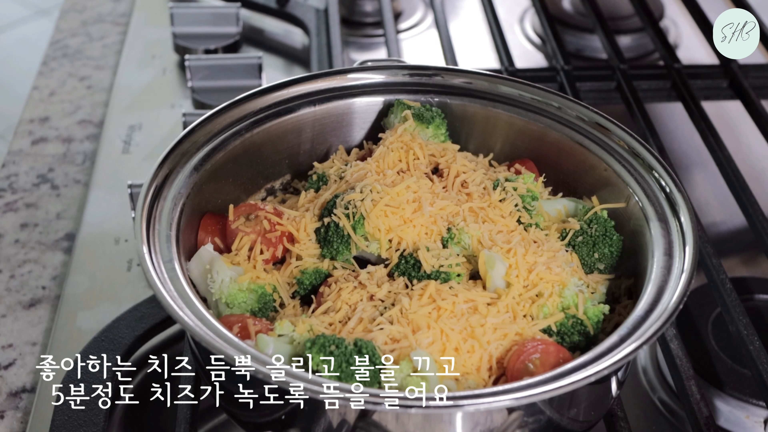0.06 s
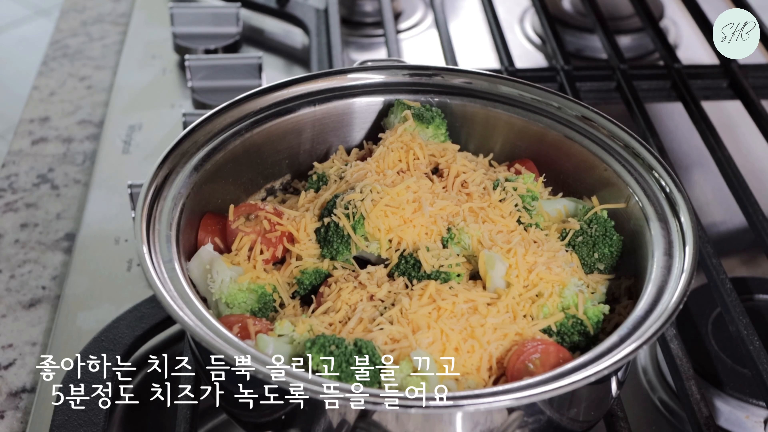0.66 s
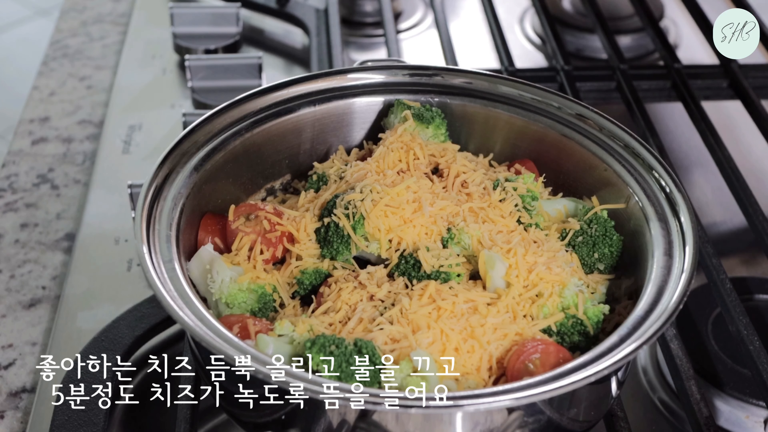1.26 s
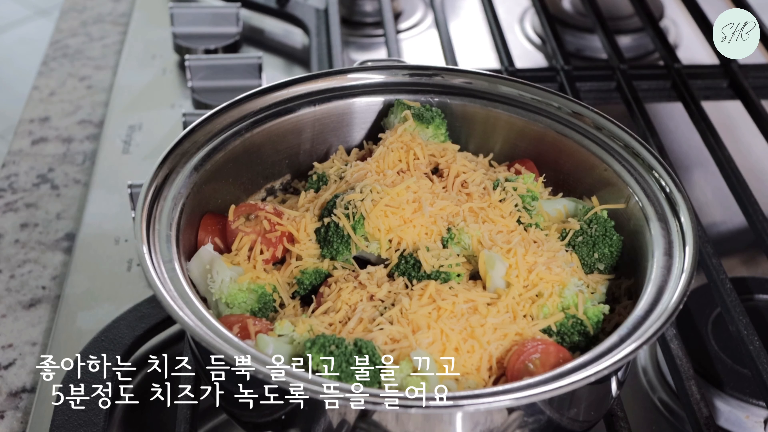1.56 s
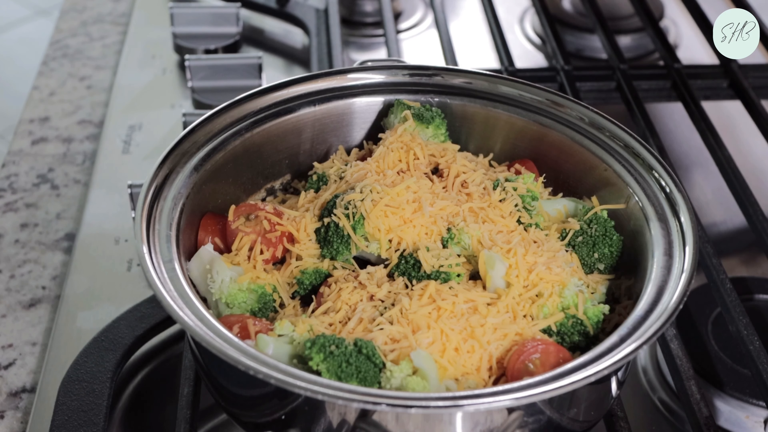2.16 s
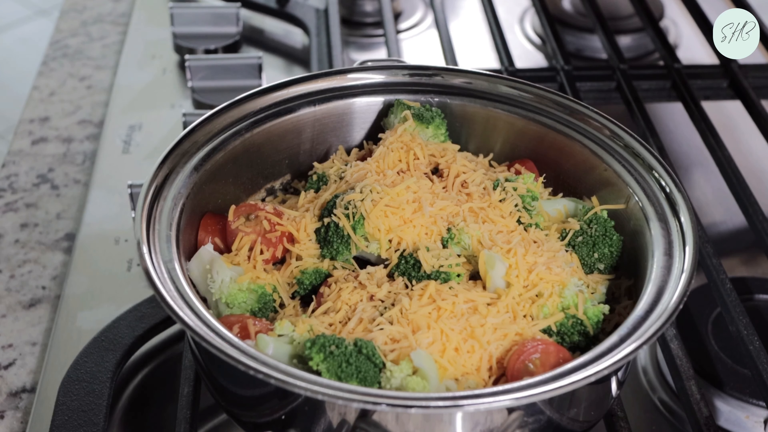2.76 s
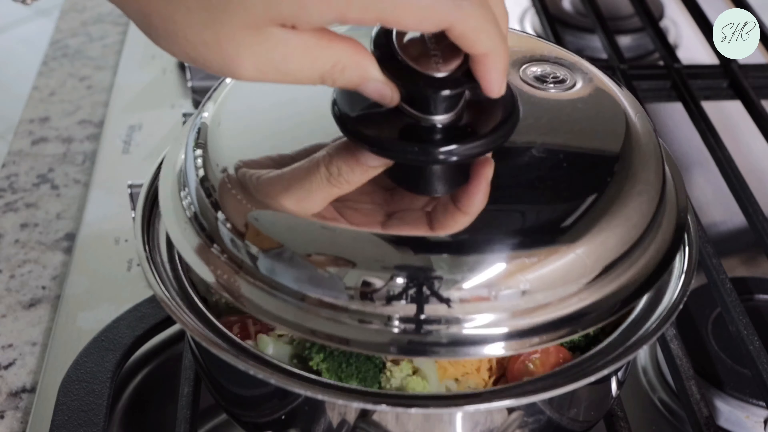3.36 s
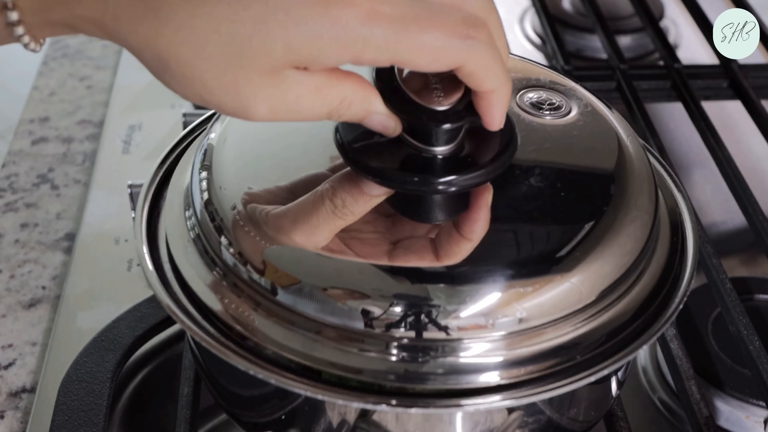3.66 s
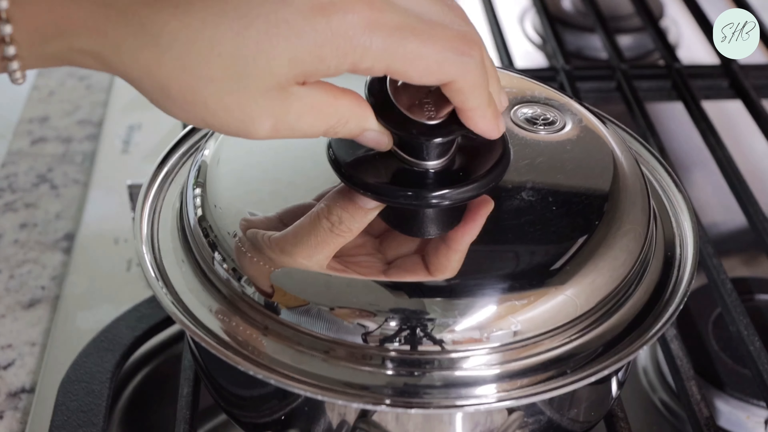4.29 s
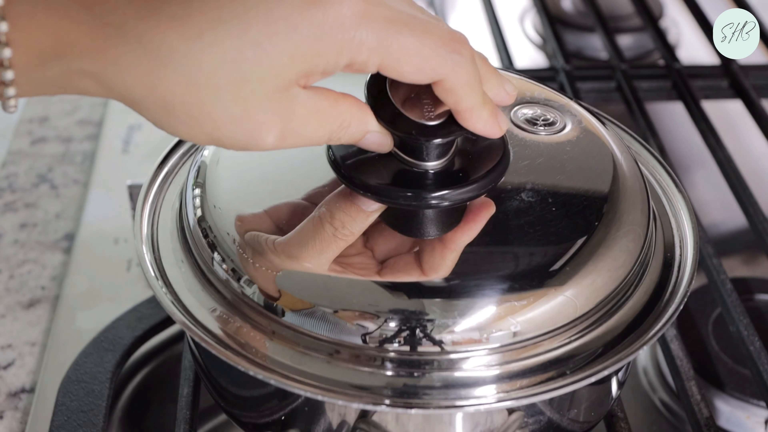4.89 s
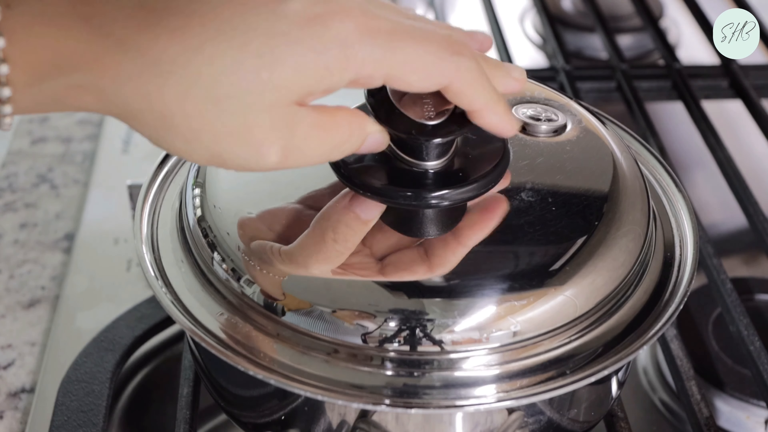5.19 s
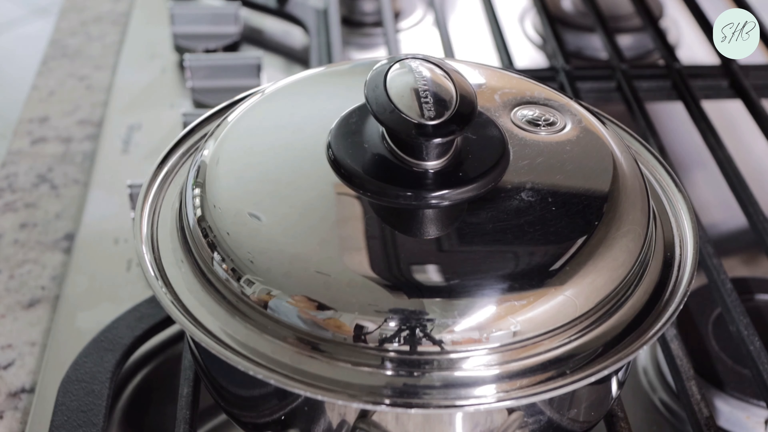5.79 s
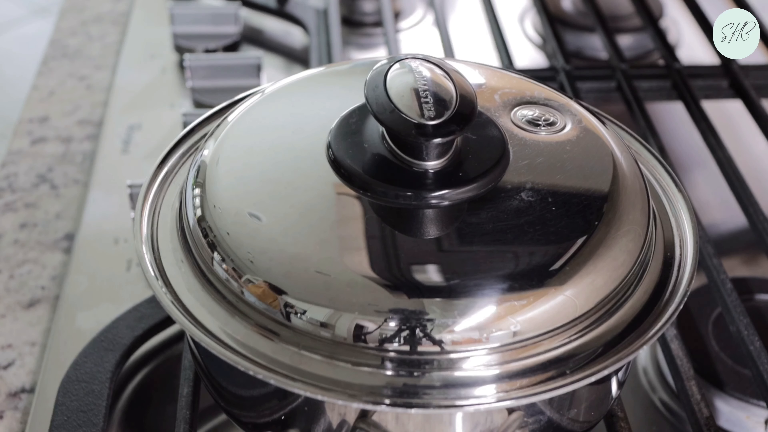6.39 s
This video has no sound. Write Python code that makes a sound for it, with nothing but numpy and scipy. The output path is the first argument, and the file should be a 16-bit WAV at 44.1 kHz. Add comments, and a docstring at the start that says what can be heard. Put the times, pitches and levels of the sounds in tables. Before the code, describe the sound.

A steel lid scrapes, clanks twice onto a pot and rattles brightly before settling, over a low steady kitchen rush.

```python
"""A steel lid clanks twice on a pot, thuds into its seat and rattles brightly as its knob is worked.
Each impact excites the modes of the metal: dense, damped ones clash, and sparse, lasting ones ring.
Earlier come knocks and shoves on the counter, a scrape whose friction sets the lifted lid singing,
and faint squeaks of the grip. A low steady rush and faint hiss fill the small, hard kitchen."""
import sys
import numpy as np
from scipy import signal
from scipy.fft import rfft, irfft, next_fast_len
from scipy.io import wavfile
from scipy.ndimage import map_coordinates

SR = 44100
rng = np.random.default_rng(int(sys.argv[2]) if len(sys.argv) > 2 else 0)


def dump(signal):
    """Clip the signal to [-1, 1] and save it as 16-bit WAV at the path in sys.argv[1]."""
    limited = np.clip(np.atleast_2d(signal).T, -1, 1)
    pcm = np.round(limited * 32767).astype(np.int16)
    wavfile.write(sys.argv[1], SR, pcm)


N = 283991
TIME = np.arange(N) / SR
AGE = np.arange(SR * 3 // 4) / SR  # time since a blow, in s
CONTACT_S = 1 / 5000  # rise time of a steel-on-steel impact
PRESS_LOSS_DB = 4.5  # ring lost at each later contact

# Levels in all tables are relative; a tilt is a spectral slope above about 400 Hz.
# Reverberation time of the kitchen: f/Hz, t60/s
ROOM_DECAY = [(150, 1), (1000, 0.58), (5000, 0.57), (15000, 0.29)]
# Spectral density of the background rush: f/Hz, level/dB
RUSH_SPECTRUM = [(12, -46), (20, -20), (92, -3.5), (171, -7.5), (202, -4.5), (259, 0), (289, -8.5),
                 (362, -2), (478, -11.5), (519, -1.5), (565, -11), (614, -10), (1720, -22), (4190, -27),
                 (15500, -32)]
# Its droning bands: f/Hz, width/Hz, level/dB
DRONE_BANDS = [(105.6, 84, -58.5), (208.1, 11, -59.5), (367, 136, -55.5), (531.4, 7.4, -58.5)]

# Things knocked beside the stove: t/s, level/dB, t60/s, tilt/(dB/octave)
KNOCKS = [(.446, -22.5, .15, 0.8), (.482, -34, 0.43, -.5), (.785, -34, 0.11, 1), (.846, -33, 0.095, -1),
          (1.19, -42, 0.44, 1), (1.333, -37, 0.19, 3), (1.378, -42.5, 0.45, 0.5), (1.905, -51.5, 0.54, 7),
          (2.221, -39.5, 0.029, 3.5)]
# Brushes of hand and sleeve: t/s, level/dB, tilt/(dB/octave)
BRUSHES = [(0.014, -40.5, -4), (.385, -40.5, 1), (2.301, -46.5, 15), (2.80, -51.5, 8), (3.079, -46, 6.5)]
# Something steel shoved along the counter: t/s, counter level/dB, steel level/dB
SHOVES = [(0.616, -35.5, -34.5), (0.948, -34.5, -47.5)]
# Resonances of the counter: f/Hz, width/Hz, level/dB
COUNTER_BANDS = [(300, 149, -6), (610, 540, 1.5), (1040, 307, -6), (1371, 1940, -2), (2760, 1200, -8.5),
                 (4150, 1900, -10), (5353, 2430, -10.5), (6946, 2900, -12.5), (8450, 1900, -15),
                 (10600, 3800, -20.5), (13970, 2954, -32.5)]
# Resonances of chafing steel: f/Hz, width/Hz, level/dB
CHAFE_BANDS = [(3380, 140, 3.5), (3817, 470, .5), (4440, 290, -6), (5420, 370, -7), (8300, 948, -9),
               (12490, 2560, -26)]

# Squeaks of the grip: t/s, duration/s, start f/Hz, end f/Hz, level/dB
SQUEAKS = [(2.24, 0.13, 4762, 4600, -58), (2.72, .061, 4383, 4290, -53.5)]
# Clusters of damped modes excited by the scrape: f/Hz, width/Hz, level/dB
RASP_BANDS = [(600, 340, 0.5), (1490, 510, 2.5), (2240, 377, -5), (2750, 373, -6.5), (3232, 240, -4.5),
              (3586, 91, 4.5), (3960, 370, -6), (4646, 320, -13), (5230, 160, -6.5), (5600, 311, -14),
              (5960, 200, -7), (6440, 130, -6.5), (7000, 250, -7), (7700, 328, -14), (8400, 292, -15),
              (8970, 270, -13.5), (9700, 880, -23), (10598, 197, -22), (11773, 1201, -28.5),
              (12530, 143, -26), (13615, 1400, -33.5)]
# Modes of the free lid: f/Hz, level/dB, t60/s
FREE_LID_MODES = [(1534, -8.5, .55), (2226, -6.5, .85), (3633, -1, .5), (3660, -2, .55), (5265, -7.5, .6),
                  (6180, -8, .45), (6304, -11, .4), (6627, -11, .4), (7127, -6, .45), (8043, -14, .35),
                  (8872, -8, .4)]

# The rim landing on the pot: t/s, level/dB, clash t60/s, tilt/(dB/octave), ring level/dB,
# fraction of the low modes' ring time that the hand leaves
LANDINGS = [(3.612, -6, 0.11, 1, -0.5, 0.77), (3.651, -17.5, 0.25, 0.1, -22, .4),
            (3.790, -5.5, .106, -0.5, -2.5, 0.29), (3.8843, -15, 0.046, -3, -23, .4)]
# Modes of lid and filled pot together: f/Hz, level/dB, t60/s
POT_MODES = [(262, -23, .45), (368, -16.5, .22), (411, -13.5, .42), (520, -12.5, .29), (592, -12.5, .17),
             (637, -14, .16), (790, -6, .42), (815, -12, .09), (950, -21, .25), (1093, -25, .35),
             (1378, -27, .25), (1630, -25, .45), (1910, -22, .38), (2020, -26, .18), (2226, -34, .9),
             (3648, -40, .46), (4900, -22.5, .27), (5390, -27, .2), (6070, -38, .19), (7100, -37, .5),
             (7680, -38, .35)]
# Clusters of their damped modes: f/Hz, width/Hz, level/dB
CLASH_BANDS = [(168, 490, -2), (403, 155, 3), (560, 180, 3), (790, 100, -3), (1010, 610, -4),
               (1370, 206, -13), (2090, 543, -17), (3027, 233, -24), (3625, 630, -31.5), (4820, 860, -20.5),
               (5440, 272, -19), (6051, 202, -18), (6550, 237, -20.5), (7080, 358, -16.5), (7500, 180, -13),
               (8150, 276, -14.5), (9000, 970, -26.5), (9799, 198, -27), (10541, 252, -23),
               (11200, 207, -26.5), (11905, 204, -23), (14002, 1999, -32)]
# The lid thudding into its seat: t/s, thud level/dB, scuff level/dB
THUDS = [(3.886, -27, -56), (3.991, -35, -44), (4.022, -33.5, -46), (4.084, -22.5, -27), (4.108, -34, -63),
         (4.227, -33, -42.5), (4.244, -31, -40), (4.274, -37, -38), (4.289, -24, -34), (4.345, -35, -40),
         (4.409, -37.5, -51), (4.783, -38, -44), (4.868, -38.5, -50), (5.001, -33, -48), (5.201, -36, -42)]
# Resonances of the filled pot on its grate: f/Hz, width/Hz, level/dB
THUD_BANDS = [(116, 60, 2.5), (207, 81, -5.5), (460, 590, -16.5), (1000, 930, -22.5)]
# Resonances of the rim, damped by its seat: f/Hz, width/Hz, level/dB
SCUFF_BANDS = [(1000, 1200, -9), (1824, 300, 3), (2310, 86, 9.5), (3690, 160, 5), (4440, 320, 0),
               (4880, 180, 5), (5330, 206, 7), (7040, 430, 4.5), (7900, 400, -1), (8870, 81, 8.5),
               (8586, 10320, -11), (12500, 149, -5), (13500, 199, -15)]

# Clacks of the seated lid: t/s, level/dB, clatter t60/s, lean of the ring from rim to dome/dB
CLACKS = [(4.3742, -16, 0.024, 3), (4.398, -17, 0.061, 14), (4.4074, -2.7, 0.066, 0),
          (4.478, -7.5, 0.076, 3.5), (4.526, -6, 0.076, 0.5), (4.5867, -16.5, 0.061, -3.5),
          (4.620, -5.5, 0.11, -2), (4.677, -6, 0.076, -1), (4.7403, -4, 0.067, 3), (4.831, -4, 0.048, -1),
          (4.840, -3.5, 0.076, 7), (4.899, -10.5, 0.098, -4.5), (4.9182, -2, 0.055, -3),
          (4.968, -15, 0.072, 5), (5.0399, -8, 0.067, 1.5), (5.059, -4.5, 0.086, -3.5),
          (5.1007, -9, 0.13, 2.5), (5.138, -8.5, 0.069, 2.5), (5.247, -8.5, 0.14, 6.5),
          (5.2743, -10.5, 0.098, 4.5)]
# Modes of the seated lid's dome: f/Hz, level/dB, t60/s
DOME_MODES = [(1444, -20, .14), (1475, -34, .55), (2058, -19, .15), (2331, -25.5, .13), (3058, -28, .2),
              (3456, -31, .3), (4226, -31, .28), (4647, -28, .2), (6072, -27, .28), (6382, -30, .15),
              (7098, -25, .18), (7375, -32, .25), (7757, -29, .25), (8232, -22, .22), (8726, -31, .22),
              (9520, -31, .25), (10020, -31, .2), (11880, -27, .15), (12340, -33, .2), (13870, -29, .1)]
# Bell-like modes of the rim, each with more waves round the edge: f/Hz, level/dB, t60/s
RIM_MODES = [(2792, -25.5, .3), (3359, -23, .33), (4094, -29, .33), (4947, -23, .27), (5886, -22, .3),
             (6928, -30, .3), (8051, -17, .27), (9256, -26, .33), (10528, -27, .24)]
# Clusters of damped modes of lid and rim: f/Hz, width/Hz, level/dB
CLACK_BANDS = [(636, 5100, -13), (1126, 617, -6), (1464, 133, 7.5), (1793, 190, 1.5), (2126, 140, 5.5),
               (2324, 46, 3), (3030, 490, -2.5), (3436, 280, -3), (4090, 330, -5), (4550, 350, 2),
               (5030, 370, 6.5), (5556, 260, 1.5), (6070, 200, 4.5), (6582, 254, 1.5), (7090, 230, 1),
               (7070, 160, 4), (7780, 110, 8.5), (8154, 440, 5.5), (8840, 193, 1), (9600, 331, -3),
               (9720, 303, -1.5), (10410, 300, -1.5), (11058, 679, -6), (11770, 150, -1.5),
               (12429, 512, -4), (13300, 404, -15), (13425, 500, -21), (14278, 460, -3.5), (15750, 300, -8)]


def amp(db):
    """Amplitude ratio of a level in decibels."""
    return 10 ** (np.asarray(db) / 20)


def unit(x):
    """Normalisation to rms 1."""
    return x / np.sqrt(np.mean(x ** 2) + 1e-20)


def along(points, hz):
    """Interpolation of (frequency, value) points on a logarithmic frequency axis."""
    freqs, values = np.transpose(points)
    return np.interp(np.log(hz + 1), np.log(freqs + 1), values)


def filtered(x, response):
    """Linear filtering: the spectrum is multiplied by a frequency response."""
    size = next_fast_len(len(x) + 8192)
    hz = np.fft.rfftfreq(size, 1 / SR)
    return irfft(rfft(x, size) * response(hz), size)[:len(x)]


def low_cut(x, hz):
    """Second-order high-pass: 12 dB lost per octave below the corner."""
    return signal.sosfilt(signal.butter(2, hz, "high", fs=SR, output="sos"), x)


def noise(bands, size, tilt_db=0):
    """Random excitation of resonances that add in power; tilted in dB per octave, at rms 1."""
    def response(hz):
        peaks = (amp(db) / (1 + (2 * (hz - centre) / width) ** 2) for centre, width, db in bands)
        power = sum(peak ** 2 for peak in peaks)
        return np.sqrt(power) * amp(tilt_db * np.log2(1 + hz / 400))
    return unit(filtered(rng.standard_normal(size), response))


def wobble(rate):
    """Random modulation: a smooth curve through `rate` knots a second."""
    knots = rng.standard_normal(int(N * rate / SR) + 4)
    return map_coordinates(knots, [TIME * rate])


def fade(t60):
    """Free decay: the amplitude falls exponentially, by 60 dB in t60."""
    return np.exp(-np.log(1000) * AGE / max(t60, 1e-3))


def stroke(start, rise, hold, t60, sag_db=0):
    """Envelope of sliding friction: it rises, sags while held, then decays freely."""
    age = TIME - start
    attack = np.clip(age / rise, 0, 1)
    sag = amp(-sag_db * np.clip(age / hold, 0, 1))
    release = np.exp(-np.log(1000) * np.maximum(age - hold, 0) / t60)
    return attack * sag * release


def burst(bands, rise, t60, tilt_db=0):
    """Modal overlap: modes too dense to tell apart build up and decay together as noise."""
    envelope = fade(t60) * (1 - np.exp(-AGE / max(rise, 1e-5)))
    envelope_rms = np.sqrt(np.mean(envelope ** 2))
    return envelope_rms * unit(noise(bands, len(AGE), tilt_db) * envelope)


def ring(modes, scatter_db, detune, sustain=1):
    """Modal superposition: damped sinusoids, weighted anew by each point of contact."""
    out = np.zeros(len(AGE))
    for (hz, db, t60), (strength, shift, polarity) in zip(modes, rng.standard_normal((len(modes), 3))):
        life = t60 * sustain ** min(1, 800 / hz)  # pressure damps the low modes most
        pitch = hz + shift * detune / t60  # the most damped modes shift most
        weight = amp(db + scatter_db * strength) * np.sign(polarity)
        out += weight * fade(life) * np.sin(2 * np.pi * pitch * AGE)
    return out


def choked(start, blows):
    """Contact damping: the gain of a ring steps down over 4 ms at every later blow."""
    contacts = sum(np.clip((start + AGE - t) / .004, 0, 1) for t, *_ in blows if t > start)
    return amp(-PRESS_LOSS_DB * contacts)


def add(track, start, sound):
    """Superposition of a sound on the track from a start time in seconds."""
    part = track[max(round(start * SR), 0):][:len(sound)]
    part += sound[:len(part)]


def in_kitchen(x, wet_db):
    """Reverberation: a diffuse tail follows the direct sound, each frequency at its own decay rate."""
    hz, t, spectrum = signal.stft(rng.standard_normal(SR // 2), SR, nperseg=256)
    decay = amp(-60 * t / along(ROOM_DECAY, hz)[:, None])
    _, tail = signal.istft(spectrum * decay, SR, nperseg=256)
    tail = np.pad(tail / np.linalg.norm(tail), (SR // 200, 0))  # reflections arrive 5 ms late
    return x + amp(wet_db) * signal.fftconvolve(x, tail)[:len(x)]


def background():
    """Stationary noise: a broad spectrum gives rush and hiss, narrow bands give a drone."""
    drone = sum(amp(db) * noise([(hz, width, 0)], N) for hz, width, db in DRONE_BANDS)
    rush = unit(filtered(rng.standard_normal(N), lambda hz: amp(along(RUSH_SPECTRUM, hz))))
    return amp(-48) * rush + drone


def squeaks():
    """Frictional oscillation at the grip: brief tones that waver and fall in pitch."""
    out = np.zeros(N)
    for start, duration, start_hz, end_hz, db in SQUEAKS:
        progress = np.clip((TIME - start) / duration, 0, 1)
        glide_hz = start_hz + (end_hz - start_hz) * progress
        pitch = glide_hz * (1 + .035 * wobble(700))
        out += amp(db) * np.sin(np.pi * progress) * np.sin(2 * np.pi * np.cumsum(pitch) / SR)
    return in_kitchen(out, wet_db=-4.5)


def handling():
    """Impact and friction excite the counter's resonances: knocks, brushes, shoves and a slide."""
    out = np.zeros(N)
    for start, db, t60, tilt_db in KNOCKS:
        add(out, start, amp(db) * burst(COUNTER_BANDS, rise=0.0025, t60=t60, tilt_db=tilt_db))
    for start, db, tilt_db in BRUSHES:
        add(out, start, amp(db) * burst(COUNTER_BANDS, rise=0.016, t60=0.33, tilt_db=tilt_db))
    rub = noise(COUNTER_BANDS, N, tilt_db=-0.5)
    chafe = noise(CHAFE_BANDS, N)
    for start, counter_db, steel_db in SHOVES:
        shove = stroke(start, rise=0.029, hold=0.028, t60=0.32)
        out += shove * (amp(counter_db) * rub + amp(steel_db) * chafe)
    slide = stroke(start=0.56, rise=0.066, hold=0.51, t60=1, sag_db=1)  # slowing, around the shoves
    out += amp(-43) * slide * noise(COUNTER_BANDS, N, tilt_db=-0.8)
    grip = unit(amp(1.14 * wobble(300) + 0.99 * wobble(44.06)))  # surfaces catch and let go
    return in_kitchen(low_cut(out * grip, hz=162), wet_db=-8.0)


def scrape():
    """Stick-slip friction: the lifted lid's edge rasps and forces its free modes into vibration."""
    catch_s, graze_s, release_t60 = 1.537, 0.025, 0.29
    tip_s, tip_width_s = 1.684, 0.025
    graze = amp(-13) * stroke(catch_s - graze_s, rise=graze_s, hold=graze_s, t60=release_t60)
    drag = stroke(catch_s, rise=0.002, hold=0.19, t60=release_t60, sag_db=6.5)  # the pressure eases
    friction = np.maximum(drag, graze) * unit(amp(1.85 * wobble(250)))
    tipped = (1 + np.tanh((TIME - tip_s) / tip_width_s)) / 2  # the rasp brightens as the lid tips up
    dull = noise(RASP_BANDS, N, tilt_db=1.0)
    bright = noise(RASP_BANDS, N, tilt_db=10.5)
    rasp = np.sqrt(1 - tipped) * dull + np.sqrt(tipped) * bright
    modes = ring(FREE_LID_MODES, scatter_db=-4.0, detune=0.29)
    force = friction * rng.standard_normal(N)
    song = signal.fftconvolve(force, modes / np.linalg.norm(modes))[:N]
    return in_kitchen(amp(-31) * friction * rasp + amp(-40.5) * song, wet_db=-2.5)


def landing():
    """Impact on coupled bodies: the held lid and the pot clank together, then thud as the lid seats."""
    out = np.zeros(N)
    for start, db, t60, tilt_db, ring_db, sustain in LANDINGS:
        clash = amp(-9.5) * burst(CLASH_BANDS, CONTACT_S, t60, tilt_db)
        tone = amp(ring_db - 4.0) * ring(POT_MODES, scatter_db=1.5, detune=0.26, sustain=sustain)
        tone *= choked(start, LANDINGS[2:])
        clank = low_cut(clash + tone, hz=230)  # the clank carries little bass below about 230 Hz
        add(out, start, amp(db) * in_kitchen(clank, wet_db=-13))
    for start, thud_db, scuff_db in THUDS:
        thud = amp(thud_db + 7.5) * low_cut(burst(THUD_BANDS, rise=0.0039, t60=0.06), hz=80)
        scuff = amp(scuff_db) * burst(SCUFF_BANDS, rise=0.0036, t60=0.058)
        add(out, start, in_kitchen(thud + scuff, wet_db=-13))
    return out


def rattle():
    """Repeated impact: the seated lid snaps and clatters; lightly damped modes ring between blows."""
    out = np.zeros(N)
    for start, db, t60, lean_db in CLACKS:
        snap = amp(-11.5) * burst(CLACK_BANDS, CONTACT_S, t60=0.021, tilt_db=2)
        clatter = amp(-8.5) * burst(CLACK_BANDS, CONTACT_S, t60, tilt_db=0.37)
        dome = amp(-6 + lean_db) * ring(DOME_MODES, scatter_db=4.5, detune=1.8)
        rim = amp(-5 - lean_db) * ring(RIM_MODES, scatter_db=4.0, detune=0.6)
        ringing = (dome + rim) * choked(start, CLACKS)
        add(out, start, amp(db) * in_kitchen(snap + clatter + ringing, wet_db=-17))
    return out


def scene():
    """Superposition: the pressures of all sources add at one point above the stove."""
    return (background() + squeaks() + handling() + scrape() + landing() + rattle())[None]


def record(dry):
    """Band limiting: an ideal low-pass removes the highest treble."""
    top_hz = 15750
    return np.array([filtered(channel, lambda hz: hz < top_hz) for channel in dry])


dry = scene()
out = record(dry)
dump(out)
```